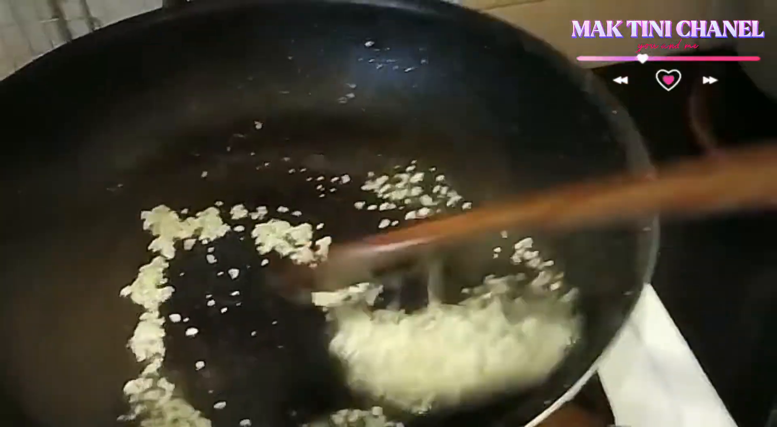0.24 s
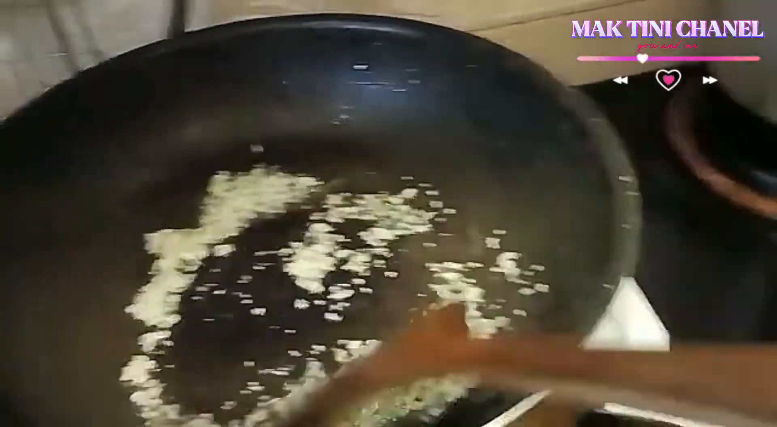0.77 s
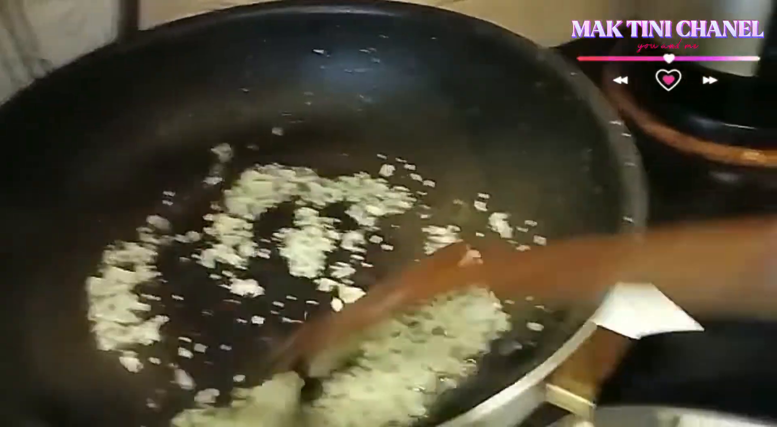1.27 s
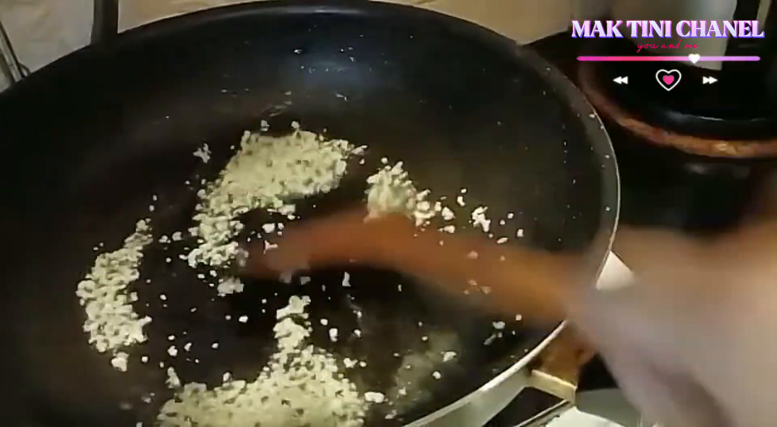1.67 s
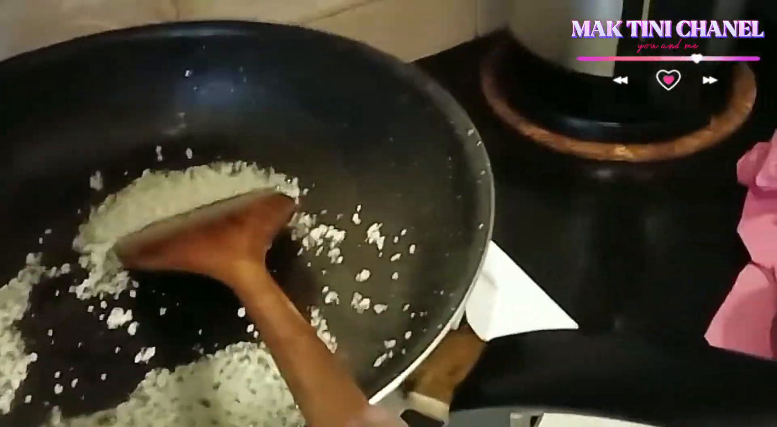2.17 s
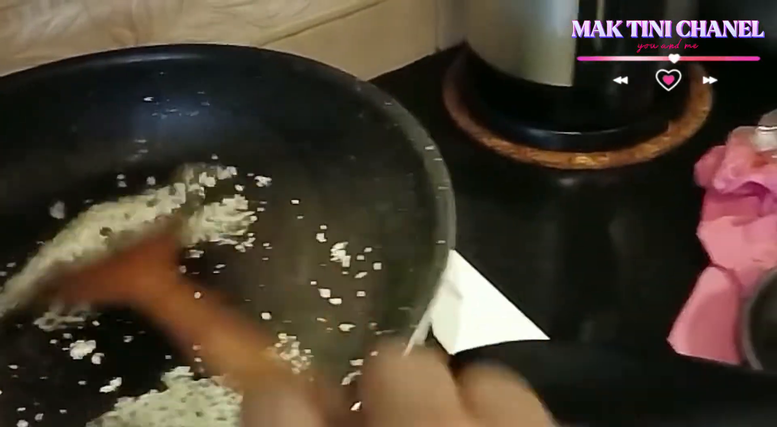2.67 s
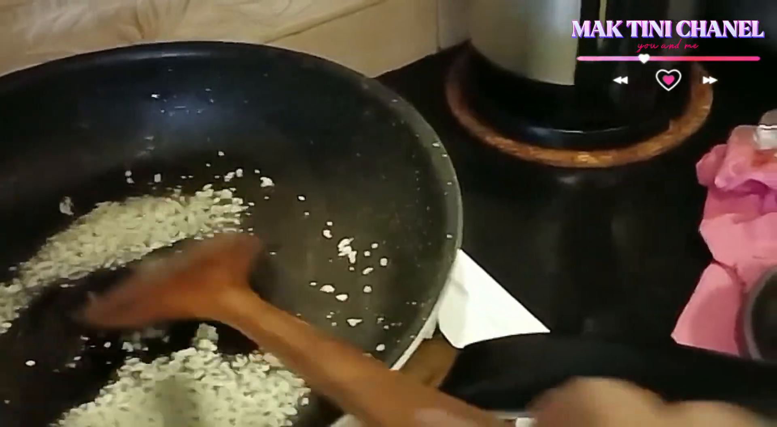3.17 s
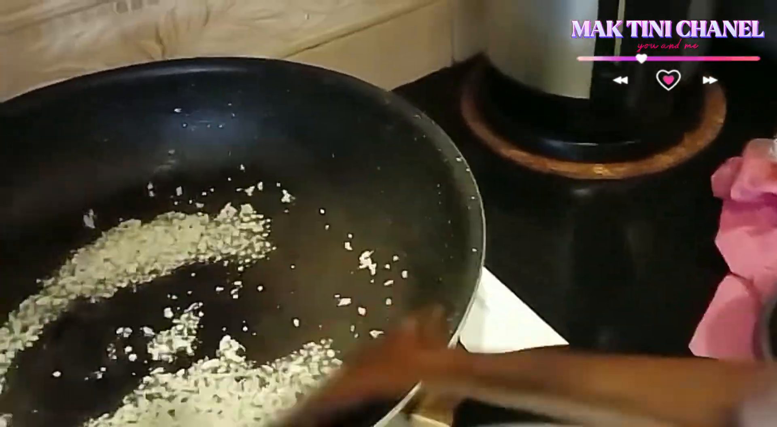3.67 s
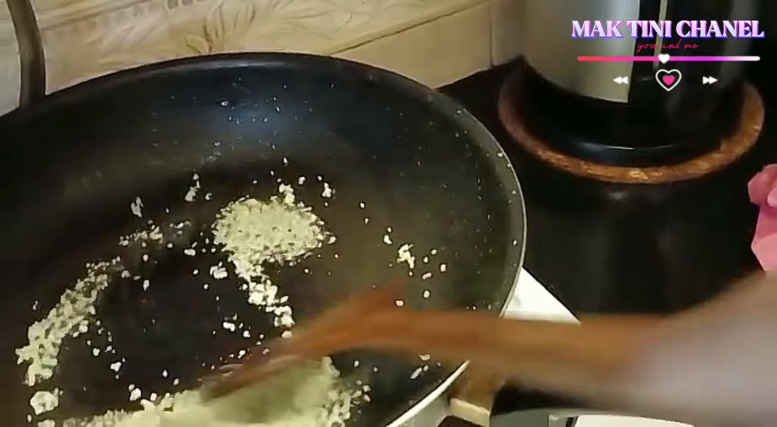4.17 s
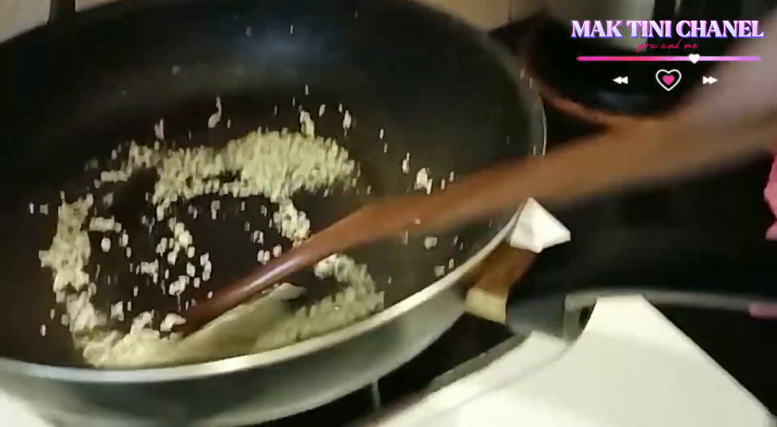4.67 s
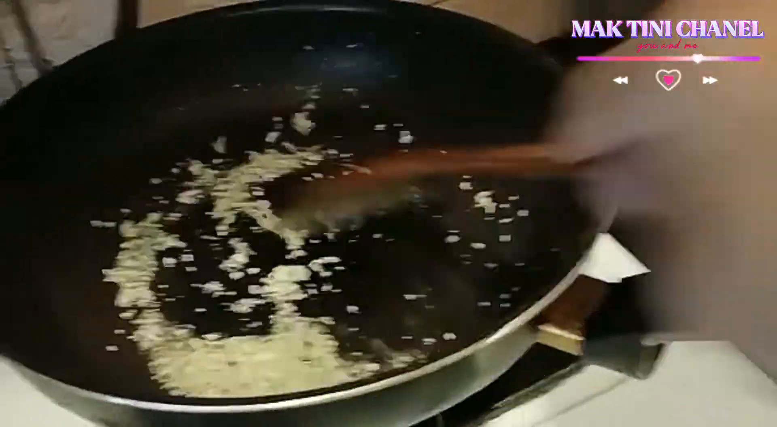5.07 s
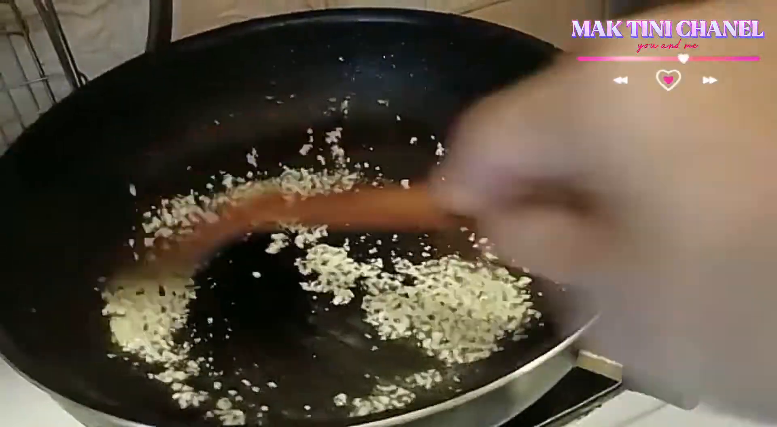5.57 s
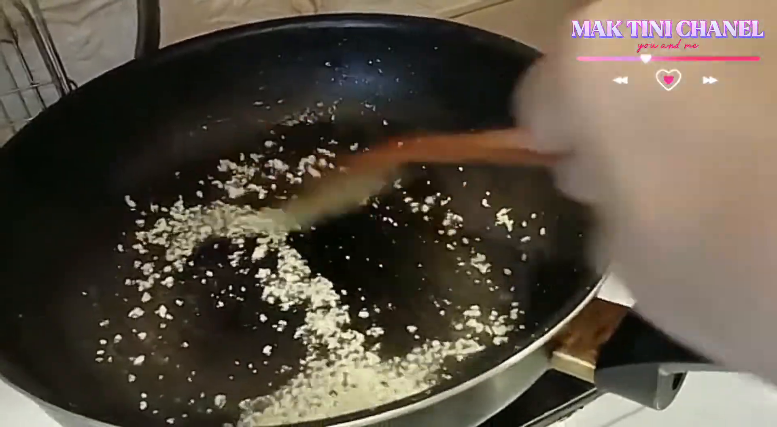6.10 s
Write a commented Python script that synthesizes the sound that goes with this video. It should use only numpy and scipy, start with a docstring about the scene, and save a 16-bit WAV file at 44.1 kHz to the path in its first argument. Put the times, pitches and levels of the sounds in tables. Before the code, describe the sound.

Wood taps and rubs a coated wok: busy scraping and knocks at first, a sharp clack mid-way, a pause, then more double knocks and a last soft scrape. Short damped rings and thin singing tones follow contacts, with low wobbling of the pan. Very quiet oil hiss slowly weakens over a steady low burner rush. Close stereo pickup, left side stronger in the mids, small short-echo room.

```python
"""In a small kitchen, a wooden spatula stirs chopped garlic in a coated wok over a gas ring.
Knocks and scrapes of the blade set the bowl's modes (its natural tones) ringing briefly; single modes
sing or ring on as thin tones. The wok rocks on its stand as a few low tones. Shaped noise makes the oil's
faint sizzle, some faint ticks and the rush of the flame. Two microphone ports hear the pan with a lag
and a colour of their own."""
import sys
import numpy as np
from scipy import signal
from scipy.fft import rfft, irfft
from scipy.io import wavfile
from scipy.ndimage import uniform_filter1d, map_coordinates

SR = 44100
rng = np.random.default_rng(int(sys.argv[2]) if len(sys.argv) > 2 else 0)


def dump_mix(stems):
    """Bounce the given channels to the path in sys.argv[1] as a 16-bit WAV at rate SR."""
    frames = np.atleast_2d(stems).T  # one column per channel
    limited = np.clip(frames, -1, 1)  # hard clip at full scale
    pcm = np.round(limited * 32767).astype(np.int16)
    wavfile.write(sys.argv[1], SR, pcm)


def attenuation_scalar(level_db):
    """Turn a level in dB into a linear amplitude multiplier (20 dB per decade)."""
    decades = np.asarray(level_db, float) / 20
    return 10 ** decades


N = 279594   # length of the sound [samples]
HZ = np.maximum(np.fft.rfftfreq(N, 1 / SR), 1)

# borders between the six families of wok modes: [Hz]
FAMILY_EDGES_HZ = [130, 430, 850, 1380, 2350, 4000, 6600]
# middle of each family: [octaves above 1 kHz]
FAMILY_MIDDLES = np.array([-2.1, -.74, .11, .85, 1.6, 2.4])
# how readily each family radiates: [dB]
FAMILY_DB = [-2.5, -2.6, -2.93, 0.96, -1.5, 3.5]
# modes of the wok: (pitch [Hz], level compared with its family [dB], 60 dB ring time before damping [s])
WOK_MODES = [(163, 7, 0.056), (266, 17, 0.072), (347, 1.5, 0.089), (533, -4, 0.29), (624.5, 9, 0.13),
             (774, -3, 0.013), (950, -12.5, 0.11), (1092, 3, 0.14), (1244, 1.5, 0.066), (1328, -3, 0.069),
             (1494, -13, 0.15), (1599, 12.5, 0.047), (1680, -11, 0.033), (1935, -1, 0.032),
             (1995, -9.5, 0.026), (2130, -9, 0.17), (2520, 1.5, 0.032), (2720, -0.5, 0.0066),
             (3000, -6, 0.028), (3426, 1.5, 0.043), (3566, -6.5, 0.072), (3830, -10.5, 0.0027),
             (4240, -6, 0.18), (4680, -0.5, 0.054), (5340, 3.5, 0.015), (5690, 1, 0.04), (6000, -19, 0.019),
             (6160, -0.5, 0.0076)]
# knocks of the blade: (time [s], level [dB], strongest ring [octaves above 1 kHz],
# narrowness of colour [dB per octave squared], pitch of the blade [Hz])
KNOCKS = [(0.095, -23.5, 0.01, 13, 1180), (0.4694, -19, 0.87, 19, 1530), (0.7113, -21, 1.17, 12, 2190),
          (0.7124, -23.5, 0.75, 5.5, 1450), (1.2236, -22, 0.15, 9, 1580), (1.478, -16, 1.1, 8.5, 1850),
          (2.6256, -19, 0.85, 5, 1078), (2.6298, -13.5, 0.21, 21, 1320), (3.7836, -15, 0.99, 10.5, 1840),
          (3.7895, -18.5, 0.6, 21, 1260), (3.848, -19, 0.75, 8, 1456), (4.6027, -26.5, 0.96, 25, 1570),
          (4.8808, -22.5, 1.06, 13, 1710), (4.887, -21, 0.52, 34, 1600), (4.8945, -19, 1.08, 15, 1680)]
# slips of the blade along the bowl: (time [s], level [dB], strongest ring [octaves above 1 kHz],
# narrowness of colour [dB per octave squared], length [s])
SLIPS = [(0.08, -28.5, -0.25, 18, 0.039), (0.136, -40, -1.2, 2.5, 0.11), (0.187, -35, 0.35, 12, 0.03),
         (0.23, -47, -0.7, 7, 0.019), (0.446, -33.5, 0.45, 29, 0.017), (0.91, -37.5, 0.013, 35, 0.037),
         (0.968, -42.5, 0.91, 7, 0.031), (0.982, -28, 0.24, 36, 0.029), (1.013, -46.5, 0.78, 3, 0.023),
         (1.149, -25.5, -0.46, 9, 0.026), (1.177, -41.5, -0.99, 19, 0.091), (1.26, -44, 1.46, 18, 0.021),
         (1.29, -50, 1.93, 30, 0.054), (1.501, -37.5, 0.25, 14, 0.034), (1.535, -30.5, -0.01, 8.5, 0.02),
         (1.705, -40, 0.053, 2.5, 0.034), (1.935, -45.5, 0.26, 3.5, 0.077),
         (2.075, -37.5, 0.1, 12.5, 0.027), (2.793, -36, 0.48, 13.5, 0.024), (2.805, -35.5, 0.81, 6, 0.035),
         (2.851, -44.5, 1.2, 12.5, 0.057), (2.917, -46, 0.032, 21, 0.08), (2.982, -42.5, 0.51, 4, 0.024),
         (3.006, -38.5, 0.53, 13, 0.028), (3.027, -42.5, -1.28, 19, 0.054), (3.048, -50, 0.24, 7, 0.04),
         (3.096, -46, 0.94, 19, 0.027), (3.11, -35.5, 0.9, 13, 0.03), (3.247, -45, 0.0062, 17, 0.062),
         (3.334, -29.5, 0.5, 6, 0.014), (4.057, -39, -0.78, 6.5, 0.028), (4.106, -57, 1.53, 15, 0.11),
         (4.465, -40.5, -1.43, 18, 0.016), (4.599, -29, -1.36, 19, 0.032), (4.652, -44.5, 0.66, 4.5, 0.043),
         (4.864, -34, 0.79, 28, 0.028), (4.869, -38, 1.8, 2, 0.03), (4.92, -47, 0.1, 5.5, 0.059),
         (5.604, -34.5, -0.67, 8, 0.062), (5.663, -40, -0.68, 6.5, 0.057), (5.67, -57, 1.05, 17, 0.3),
         (5.67, -51.5, 1.4, 5, 0.05)]
# rocking of the wok on its stand: (time [s], level of the lowest mode [dB], length [s])
ROCKS = [(.118, -43, 0.17), (0.204, -40.5, 0.1), (0.252, -47, 0.071), (0.468, -37.5, 0.12),
         (0.505, -46.5, 0.19), (0.713, -44, 0.074), (1.169, -38.5, 0.33), (1.226, -37, 0.15),
         (1.493, -43, 0.27), (1.511, -43.5, 0.13), (1.734, -52.5, 0.084), (2.102, -51.5, 0.15),
         (2.637, -41, 0.1), (2.674, -45.5, 0.21), (3.024, -49.5, 0.084), (3.787, -39.5, 0.27),
         (3.856, -41, 0.17), (4.079, -47, 0.26), (4.616, -47.5, 0.13), (4.898, -38.5, 0.64),
         (5.129, -50, 0.13), (5.666, -40, 0.35)]
# single modes singing or ringing on after contact:
# (time when loudest [s], pitch [Hz], level [dB], swell [s], fade [s])
SINGING_MODES = [(.97, 1042, -33.5, 0.015, 0.032), (1.008, 1030, -33, 0.038, 0.021),
                 (1.324, 1053, -46.5, 0.048, 0.028), (1.542, 1067, -30, 0.033, 0.044),
                 (1.557, 2694, -49, .006, 0.033), (3.133, 4710, -49, 0.033, 0.033),
                 (2.95, 1058, -46.5, 0.32, 0.069), (3.042, 1088, -42.5, 0.022, 0.032),
                 (3.1, 1077, -45, 0.021, 0.17), (0.11, 655, -31, 0.04, 0.037),
                 (.197, 1602, -34, .005, 0.037), (0.22, 518, -40, 0.1, 0.067),
                 (.936, 1306, -36, 0.012, 0.016), (.93, 1086, -45, 0.04, 0.12),
                 (1, 536.4, -42.5, 0.045, 0.091), (1.005, 1600, -49, 0.061, 0.059),
                 (1.015, 2540, -44, 0.052, 0.038), (1.039, 916, -43.5, 0.06, 0.012),
                 (1.285, 1600, -44, .03, 0.036), (1.316, 1561, -40, .06, 0.027),
                 (2.808, 3400, -32.5, 0.0066, 0.08), (2.83, 2270, -47, 0.065, 0.096),
                 (2.9, 3385, -48, .04, .04), (2.925, 2440, -49, 0.068, 0.024),
                 (3.033, 1625, -50, 0.019, 0.038), (3.07, 1634, -43, 0.048, .04),
                 (3.128, 2600, -37, .02, 0.044), (3.123, 1610, -40.5, 0.0051, 0.076),
                 (4.608, 662, -38, 0.011, 0.026), (4.075, 648.4, -39, 0.026, 0.037),
                 (4.67, 5350, -57, 0.095, 0.062), (0.477, 1623, -31.5, 0.039, 0.021),
                 (1.555, 1643, -47, .04, 0.044), (4.65, 1610, -53, 0.034, 0.13),
                 (4.665, 3320, -59, 0.064, 0.15), (1.172, 1288, -41.5, 0.038, 0.017),
                 (1.3, 1646, -50, 0.027, 0.037), (0.102, 1610, -36, 0.021, 0.046),
                 (3.853, 3650, -38, 0.013, 0.014), (4.611, 1582, -33, 0.0064, 0.024),
                 (1.483, 4500, -49, .006, 0.032), (1.484, 1097, -35.5, 0.0088, 0.05),
                 (4.93, 1690, -53, .03, 0.077), (5.684, 1600, -39, 0.042, 0.054),
                 (5.714, 1680, -44, 0.027, 0.06), (5.75, 1080, -53, 0.03, 0.061)]
# vigour of the frying: (time [s], sizzle level [dB])
FRYING = [(0.0, -49.5), (0.76, -49.5), (1.08, -50.5), (1.75, -51), (2.68, -54.5), (2.96, -53.5),
          (3.39, -56.5), (5.0, -57.5), (5.7, -55.5), (6.34, -57.5)]
# colour of the sizzle: (frequency [Hz], relative level [dB])
SIZZLE_COLOUR = [(1500, -55), (2400, 6.5), (4000, 10), (6000, 11), (9400, 15), (11500, 9.5), (12200, 2),
                 (12700, 7), (13600, -17), (14100, -18), (14500, 10), (15600, 10.5), (16000, -26)]
# faint ticks: (time [s], level [dB])
TICKS = [(1.221, -42), (1.808, -50), (2.795, -39), (3.739, -41.5), (4.1087, -44)]
# colour of the flame: (frequency [Hz], relative level [dB])
FLAME_COLOUR = [(25, -22), (50, -9.5), (80, 9.5), (130, -2.5), (220, -3), (360, 7.5), (520, -2), (750, 4.5),
                (1100, 1.5), (1500, 3.5), (1950, -0.5), (2300, -7.5), (3500, -17)]
# how alike the flame is at the two ports: (frequency [Hz], likeness [0-1])
FLAME_LIKENESS = [(60, 0.83), (200, 0.03), (400, 0.05), (700, 0)]
# the right port is shadowed around 1 kHz: (frequency [Hz], left over right [dB])
PORTS = [(60, 2), (300, 3), (500, 4), (750, 4.5), (1000, 12), (1300, 9), (1700, 8.5), (2400, 5.5),
         (4400, 2.5), (8000, -1), (15000, -1)]

BOUNCE_DB = -27.0   # level step from one bounce of a knock to the next
CRACK_T60_S = 0.0058   # the dry contact noise of wood on the coating dies at once


def rms_one(x):
    """Scales to unit rms (average strength)."""
    return x / np.sqrt(np.mean(x ** 2) + 1e-20)


def in_time(rows):
    """Turns the columns of a table into signals, joining the points by straight lines."""
    s, *columns = np.transpose(rows)
    return np.array([np.interp(np.arange(N) / SR, s, column) for column in columns])


def at_hz(points, hz):
    """Reads a spectrum on a log-frequency axis."""
    point_hz, value = np.transpose(points)
    return np.interp(np.log(hz), np.log(point_hz), value)


def drift(per_s):
    """Smooth random wandering through per_s random points a second."""
    knots = rng.standard_normal(1600)
    return map_coordinates(knots, [np.arange(N) / SR * per_s], order=2)


def grains(per_s, spread_db):
    """Random clicks of uneven size in two unrelated channels; rms 1."""
    sizes = attenuation_scalar(spread_db * np.minimum(rng.exponential(1, (2, N)), 5))
    signed = sizes * rng.choice([-1, 1], (2, N))
    return rms_one(signed * (rng.random((2, N)) < per_s / SR))


def ring(force, hz, t60):
    """A resonance: a unit click sets a sine of starting height 1 ringing, down 60 dB after t60 seconds."""
    r, w = attenuation_scalar(-60 / (t60 * SR)), 2 * np.pi * hz / SR
    return signal.lfilter([0, np.sin(w)], [1, -2 * r * np.cos(w), r * r], force + 1e-18)


def flame(level_db, patchy_db=2.2, rumble_db=3.5):
    """A dull rush of noise whose bands waver apart, the lowest most; only the bass is shared by both ports."""
    common, own = rfft(rng.standard_normal((2, 2, N)))
    alike = at_hz(FLAME_LIKENESS, HZ)
    mixed = np.sqrt(alike) * common[0] + np.sqrt(1 - alike) * own
    spectrum = mixed * attenuation_scalar(at_hz(FLAME_COLOUR, HZ))
    # half octaves, but the first band holds all below 120 Hz and the last all the top
    band = np.clip((2 * np.log2(HZ / 60)).astype(int), 1, 11)
    rush = np.zeros((2, N))
    for k in range(1, 12):
        waver_db = patchy_db * drift(12)
        if k == 1:
            waver_db = waver_db + rumble_db * drift(8.1)
        rush += irfft(spectrum * (band == k), N) * attenuation_scalar(waver_db)
    return rms_one(rush) * attenuation_scalar(level_db)


def sizzle(level_db, crackle=0.6, flicker_db=0.7):
    """Thousands of tiny steam bursts a second merge into a hiss: coloured noise and clicks."""
    source = rng.standard_normal((2, N)) + crackle * grains(4400, 4.2)
    hiss = rms_one(irfft(rfft(source) * attenuation_scalar(at_hz(SIZZLE_COLOUR, HZ)), N))
    return hiss * attenuation_scalar(level_db + flicker_db * drift(20.8))


def family_db(level_db, strongest, narrow):
    """Where the blade touches sets which families ring: they get weaker away from the strongest octave."""
    distance = np.subtract.outer(FAMILY_MIDDLES, strongest)
    return np.add.outer(FAMILY_DB, level_db) - np.maximum(narrow, 0) * distance ** 2


def scrape_pressure(rise_s=0.01, smooth_s=0.0079):
    """Strength that the scrapes feed into each mode family: a soft start, then a smooth fade."""
    power, t = np.zeros((6, N)), np.arange(SR // 4) / SR
    # a soft, weaker scrape of wider colour begins 11 ms before each knock
    soft_scrapes = [(s - 0.011, db - 16, strongest, narrow * 0.71, 0.022)
                    for s, db, strongest, narrow, _ in KNOCKS]
    for s, level_db, strongest, narrow, length in SLIPS + soft_scrapes:
        rise = np.sin(np.pi / 2 * np.minimum(t / rise_s, 1)) ** 2
        shape = rise * np.exp(-(t / max(length, 0.005)) ** 2)
        start = int(s * SR)
        height = attenuation_scalar(family_db(level_db, strongest, narrow))[:, None]
        power[:, start:start + len(t)] += (height * shape) ** 2
    r = np.exp(-1 / (smooth_s * SR))
    return signal.lfilter([1 - r], [1, -r], np.sqrt(power))


def scraped_mode(rub, hz, t60, swell_db=5, rasp_db=-8):
    """Scraping grains ring one mode, with a dry rasp; the contact point moves, so it swells and fades."""
    tone = rms_one(ring(rub, hz, t60 * 1.16))
    rasp = rms_one(ring(rub, hz, CRACK_T60_S))
    return attenuation_scalar(swell_db * drift(25)) * (tone + attenuation_scalar(rasp_db) * rasp)


def struck_mode(at, level_db, hz, t60, soft, contact_t60=0.021, contact_db=2.0, crack_db=-5,
                damping=0.44, scatter_db=2.5):
    """Knocks ring one mode, at its own strength and sign in each port, and add a dry crack."""
    blows = np.zeros((2, N))
    delay = (rng.random((len(at), 1)) * 0.001975 * SR).astype(int)   # a random wait of up to 2 ms
    for port in blows:
        luck = attenuation_scalar(scatter_db * rng.standard_normal(at.shape)) * rng.choice([-1, 1], at.shape)
        np.add.at(port, at + delay, luck * attenuation_scalar(level_db[:, None] + BOUNCE_DB * np.arange(3)))
    # soft wood builds the swing over some cycles
    push = ring(blows, hz, contact_t60) * 2 * np.log(1000) / (contact_t60 * SR)
    # the blade stays on the bowl after a blow and shortens the ring
    tone = ring(push, hz, t60 * damping)
    return soft * attenuation_scalar(contact_db) * tone + attenuation_scalar(crack_db) * ring(blows, hz, CRACK_T60_S)


def blade_tocks(at, knock_db, blade_hz, contact_s=0.0055):
    """The wood adds a tock of its own, a short tone that lasts only as long as the contact."""
    out = np.zeros(N)
    touch = np.arange(int(contact_s * SR)) / SR
    for k, hz in enumerate(blade_hz):
        clicks = np.zeros(SR // 10)
        clicks[at[k] - at[k, 0]] = attenuation_scalar(BOUNCE_DB * np.arange(3))
        burst = np.sin(np.pi * touch / contact_s) ** 2 * np.sin(2 * np.pi * hz * touch)
        tock = np.convolve(clicks, burst)[:len(clicks)]
        out[at[k, 0]:at[k, 0] + len(clicks)] += attenuation_scalar(knock_db[:, k].max()) * tock / tock.max()
    return out


def wok(alike=0.47, bounce_s=0.0036):
    """Knocks and scraping grains set the same modes of the bowl ringing; the blade adds its tocks."""
    s, level_db, strongest, narrow, blade_hz = np.transpose(KNOCKS)
    knock_db = family_db(level_db, strongest, narrow)
    jitter = 1 + 0.266 * rng.standard_normal((len(s), 3)).clip(-2, 2)
    at = ((s[:, None] + np.arange(3) * jitter * bounce_s) * SR).astype(int)   # a touch and two bounces
    rub = grains(4000, 2.4)
    rub[1] = alike * rub[0] + np.sqrt(1 - alike ** 2) * rub[1]
    modes = np.array(WOK_MODES)
    family = np.searchsorted(FAMILY_EDGES_HZ, modes[:, 0]) - 1
    scraped, struck = np.zeros((2, 6, 2, N))
    for (hz, mode_db, t60), f in zip(WOK_MODES, family):
        share = attenuation_scalar(mode_db) / np.sqrt(np.sum(attenuation_scalar(modes[family == f, 1]) ** 2))
        soft = min(1, 4500 / hz) ** 2   # wood is too soft to drive the top modes hard
        # scraping favours the strong modes
        scraped[f] += share ** 1.12 * soft ** 2 * scraped_mode(rub, hz, t60)
        struck[f] += share * struck_mode(at, knock_db[f], hz, t60, soft)
    # the hand's pressure, not the grain, sets how loud a family rings
    grain_power = np.mean(scraped ** 2, 1, keepdims=True)
    scraped /= np.sqrt(uniform_filter1d(grain_power, size=SR // 50))
    bowl = struck + scraped * scrape_pressure()[:, None]
    out = np.zeros((2, N))
    for part, low, high in zip(bowl, FAMILY_EDGES_HZ, FAMILY_EDGES_HZ[1:]):
        # each family radiates in its own range
        own_range = signal.butter(2, [low * 0.9, high * 1.1], "band", fs=SR, output="sos")
        out += signal.sosfilt(own_range, part)
    return out + blade_tocks(at, knock_db, blade_hz)


def singing_modes(waver=0.011, flutter_db=3.6, edge_db=-36.5, sag_hz_per_s=210, rounding=1.59):
    """Single modes sing or ring on after contact: thin tones that swell, fade, sag and waver."""
    out, t = np.zeros(N), np.arange(N) / SR
    loose = 1 + waver * drift(60)
    flutters = [attenuation_scalar(flutter_db * drift(210)) for _ in range(3)]   # modes that sing together flutter apart
    for k, (s, hz, level_db, swell, fade) in enumerate(SINGING_MODES):
        # 0 at the loudest moment, 1 where the level has dropped by edge_db
        away = np.maximum((s - t) / max(swell, 0.003), (t - s) / max(fade, 0.003))
        height = attenuation_scalar(level_db + edge_db * away ** rounding) * np.sqrt(2)
        pitch = hz - sag_hz_per_s * np.maximum(t - s, 0)
        tone = np.sin(2 * np.pi * np.cumsum(pitch * loose) / SR)
        out += flutters[k % 3] * height * tone
    return out


def rocking(rise_s=0.0014):
    """Three low modes swell a moment after each push and die at a rate set by the grip."""
    out = np.zeros(N)
    for s, level_db, length in ROCKS:
        length = max(length, 0.03)
        # a tight grip stops the swing early and favours the upper modes
        upper_db = 5 - 9.5 * np.log2(10 * length)
        start = int(s * SR)
        t = np.arange(min(SR // 2, N - start)) / SR
        spent = t / length
        # friction stops the last swings: the fade gets steeper
        shape = (1 - np.exp(-t / rise_s)) ** 2 * attenuation_scalar(-45 * spent - 60 * spent ** 2)
        for hz, above_db in ((168.6, 0), (248.3, upper_db), (318, upper_db - 1.5)):
            detuned = hz * (1 + 0.012 * rng.standard_normal())
            tone = np.sin(2 * np.pi * detuned * t)
            out[start:start + len(t)] += attenuation_scalar(level_db + above_db) * shape * tone
    out = out * attenuation_scalar(1.8 * drift(35))   # the feet chatter unevenly
    # the rocking carries no deep rumble below its low tones
    return signal.sosfilt(signal.butter(2, 90, "high", fs=SR, output="sos"), out)


def kitchen(x, t60_s=0.13):
    """The room's echo: a short tail of dull, dying noise, its own in each channel."""
    t = np.arange(SR // 3) / SR
    tail = rng.standard_normal((2, len(t))) * attenuation_scalar(-60 * t / t60_s) * (t > 0.004)
    tail = signal.lfilter([1], [1, -0.6], tail)   # dulls the treble
    tail /= np.sqrt(np.sum(tail ** 2, 1, keepdims=True))
    return signal.fftconvolve(x, tail, axes=1)[:, :N]


def ticks(decay_s=0.013):
    """Faint ticks: short bursts of fading bright noise, unrelated in the two ports."""
    strength = np.zeros(N)
    for s, level_db in TICKS:
        strength[int(s * SR)] = attenuation_scalar(level_db)
    fading = signal.lfilter([1], [1, -np.exp(-1 / (decay_s * SR))], strength + 1e-18)
    bursts = rng.standard_normal((2, N)) * fading
    return signal.sosfilt(signal.butter(2, [1500, 10500], "band", fs=SR, output="sos"), bursts)


def scene():
    """Adds up the pan, its echo, the oil, the ticks and the flame."""
    sizzle_db, = in_time(FRYING)
    pan = wok() + singing_modes() + rocking()
    echo = attenuation_scalar(-15) * kitchen(pan)
    return pan + echo + sizzle(sizzle_db) + ticks() + flame(-55.5)


def band_limit(x):
    """A steep low-pass at the top of the band."""
    return signal.sosfilt(signal.butter(12, 15900, fs=SR, output="sos"), x)


def record(dry, left_lag_s=0.00099):
    """The ports split the sound by frequency; the left one hears it later."""
    right = attenuation_scalar(-at_hz(PORTS, HZ))
    left = np.exp(-2j * np.pi * HZ * left_lag_s)   # a pure delay
    ports = np.array([left, right]) * 2 / np.sqrt(1 + right ** 2)
    mix = irfft(rfft(dry) * ports, N)
    return band_limit(mix)


dry = scene()
out = record(dry)
dump_mix(out)
```